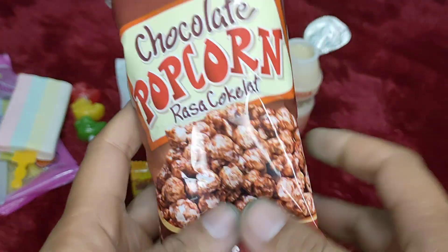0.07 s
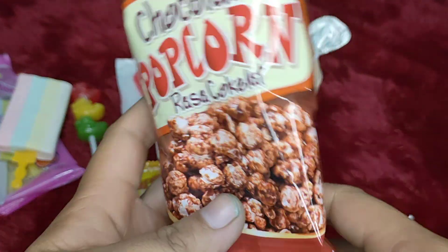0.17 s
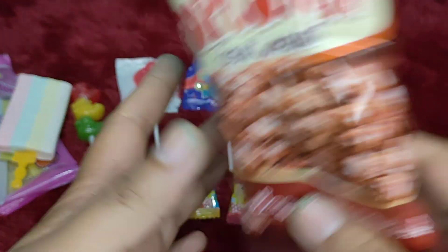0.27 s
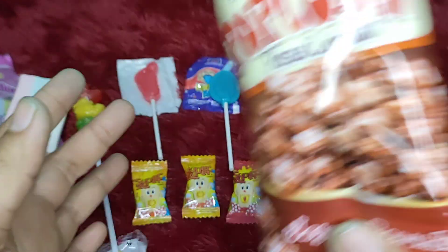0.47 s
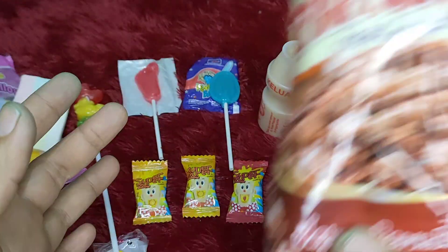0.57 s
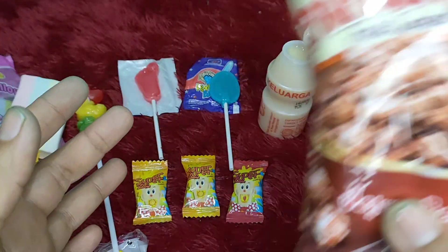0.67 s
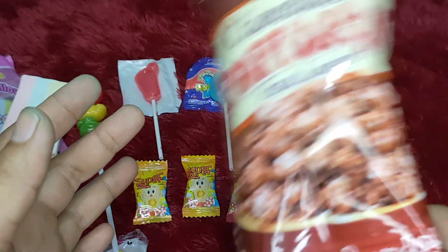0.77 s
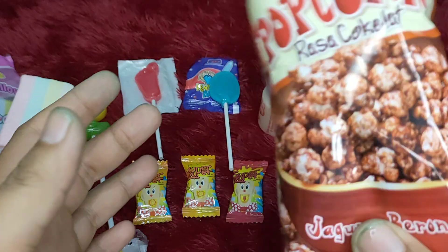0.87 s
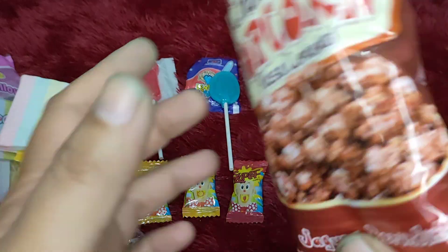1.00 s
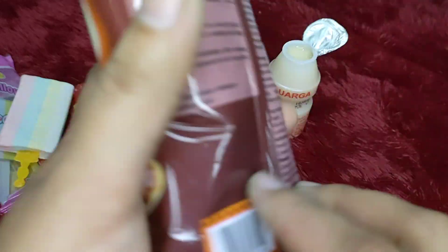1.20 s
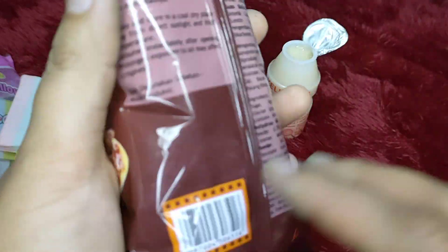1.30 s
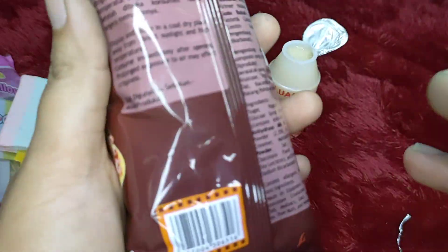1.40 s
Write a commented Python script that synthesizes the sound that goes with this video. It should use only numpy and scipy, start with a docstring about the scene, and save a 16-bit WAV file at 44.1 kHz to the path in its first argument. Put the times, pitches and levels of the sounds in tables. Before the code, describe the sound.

A plastic bag of popcorn is gripped with a crinkle, then shaken in quick rattling strokes with soft thumps. The shaking weakens and the wrapper crackles as it is turned over, close to the microphone in a small room.

```python
"""A plastic bag of chocolate popcorn is picked up, shaken and turned over in a small room, close to a
stereo pair of microphones and a little to the left. At each reversal of the hand, about eleven times a
second, the kernels pile into the bag wall, thump the air inside and then settle. The film rustles under
the fingers, its creases snap, and a fingertip now and then bumps the filled bag."""
import sys
import numpy as np
from scipy import signal
from scipy.io import wavfile

SR = 44100
rng = np.random.default_rng(int(sys.argv[2]) if len(sys.argv) > 2 else 0)


def dump(signal):
    """Clip the signal to [-1, 1] and save it as 16-bit WAV at the path in sys.argv[1]."""
    limited = np.clip(np.atleast_2d(signal).T, -1, 1)
    pcm = np.round(limited * 32767).astype(np.int16)
    wavfile.write(sys.argv[1], SR, pcm)


N = 63945


def amp(db):
    """Decibels to gain."""
    return 10 ** (np.asarray(db) / 20)


def read(points, hz):
    """Reads a table on a log-frequency axis."""
    f, value = np.transpose(points)
    return np.interp(np.log(hz + 1), np.log(f), value)


def add(mix, start_s, sound):
    """Adds a stereo sound to the mix at its start time."""
    part = mix[:, max(round(start_s * SR), 0):][:, :sound.shape[1]]
    part += sound[:, :part.shape[1]]


def pan(db):
    """Gains for a source that is db louder at the left microphone than at the right."""
    return amp(np.array([[db], [-db]]) / 2)


def lead(pair, lead_s):
    """Lets the nearer, left microphone hear a sound before the right."""
    right = np.pad(pair[1], (round(lead_s * SR), 0))[:pair.shape[1]]
    return np.array([pair[0], right])


def colour(pair, points, modes=(), size=4096):
    """Filters a mid-side pair by a spectrum scaled to unit power and returns left and right."""
    # stereo width at the microphones: (frequency [Hz], side minus mid [dB])
    width = [(60, -2.5), (150, -6.5), (500, -12), (1000, -5), (2000, -2), (4000, 0), (12000, -0.5)]
    hz = abs(np.fft.fftfreq(size, 1 / SR))
    lift_db = sum(db / (1 + (2 * (hz - f) / band_hz) ** 2) for f, band_hz, db in modes)
    gain = amp(read(points, hz) + lift_db)
    log_gain = np.log(np.maximum(gain / np.sqrt(np.mean(gain ** 2)), 1e-5))
    side_ratio = amp(read(width, hz))
    shares = np.array([np.ones(size), side_ratio]) / np.sqrt(1 + side_ratio ** 2)
    minimum_phase = np.exp(np.conj(signal.hilbert(log_gain + np.log(shares))))
    taps = np.fft.ifft(minimum_phase).real[:, :size // 2]
    mid, side = signal.fftconvolve(pair, taps, axes=1)[:, :pair.shape[1]]
    return np.array([mid + side, mid - side])


def impacts(per_s, spread_db, decay_s, size=400):
    """Tiny impacts at random moments: each a fast-dying burst and a ping from that patch of film."""
    low_hz, high_hz, ping_decay_s, ping_db = 694, 4554, 0.0015, -5
    hits = np.flatnonzero(rng.random(N) < per_s / SR)
    strength = amp(spread_db * np.clip(rng.standard_normal(N), -2, 2))
    strength /= np.sqrt(np.mean(strength ** 2) * per_s / SR)  # same power at any rate
    hz = low_hz * (high_hz / low_hz) ** rng.random(N)
    noise, phase = rng.standard_normal((2, N + size)), rng.random((N, 2, 1))
    offset = rng.integers(0, N, N)
    t, out = np.arange(size) / SR, np.zeros((2, N))
    burst_shape = np.exp(-t / decay_s) * np.sqrt(2 / (decay_s * SR))
    ping_shape = np.exp(-t / ping_decay_s) * -np.expm1(-t / decay_s) * 2 / np.sqrt(ping_decay_s * SR)
    for i in hits:
        burst = noise[:, offset[i]:offset[i] + size] * burst_shape
        ping = np.sin(2 * np.pi * (hz[i] * t + phase[i])) * ping_shape * np.sqrt(hz[i] / high_hz)
        add(out, i / SR, strength[i] * (burst + amp(ping_db) * ping))
    return out


def room_tone():
    """The faint, steady background of the room, strongest in the bass."""
    # background spectrum: (frequency [Hz], relative level [dB])
    spectrum = [(20, -2), (45, -8.5), (100, -11.5), (300, -12.5), (1000, -17), (4000, -21), (8000, -35),
                (16000, -46)]
    return amp(-55.5) * colour(rng.standard_normal((2, N)), spectrum)


def rustle():
    """Fine crinkles of the film follow the grip of the fingers."""
    # film rustling under the fingers: (time [s], level [dB])
    grip_levels = [(0, -56), (0.061, -50), (0.134, -47), (0.186, -34), (.24, -37.5), (.285, -42),
                   (.40, -36), (.67, -36.5), (.85, -33.5), (1.0, -36.5), (1.10, -37.5), (1.22, -34),
                   (1.28, -42), (1.35, -41.5), (1.40, -49), (1.45, -49)]
    # spectrum of the crinkling film: (frequency [Hz], relative level [dB])
    film_spectrum = [(50, -34.5), (100, -24), (170, -4), (350, -2.5), (550, -6.5), (850, 1), (1500, -3),
                     (2400, -3), (4000, -3), (5600, -10), (7400, -20.5), (16000, -34.5)]
    grip = amp(np.interp(np.arange(N) / SR, *np.transpose(grip_levels)))
    crinkles = impacts(per_s=1800, spread_db=1, decay_s=0.00057)
    return pan(1.5) * colour(grip * crinkles, film_spectrum)


def snap(hz, ring_s, crack_db, knock_db, pan_db, size=2048):
    """One crease buckles: a crack with a fluttering tail, a short ring of the film and a dull knock."""
    # spectrum of the crack: (frequency [Hz], relative level [dB])
    crack_spectrum = [(100, -9.5), (500, -14.5), (1500, 0), (4000, 5.5), (5500, 2.5), (8000, -10.5),
                      (12000, -20), (16000, -27)]
    # spectrum of the knock: (frequency [Hz], relative level [dB])
    knock_spectrum = [(40, -26), (130, -13), (330, -0.5), (800, -5), (1500, -5), (4000, -14.5),
                      (16000, -95)]
    crack_s, flutter_s, flutter_db, knock_s = 0.00014, 0.0038, -12, 0.0029
    t = np.arange(size) / SR
    ring = np.sin(2 * np.pi * hz * t) * np.exp(-t / ring_s) * -np.expm1(-2 * hz * t)
    ring = np.outer([1, pan_db == 0], ring)  # left microphone only, unless the snap is dead centre
    crack_noise, knock_noise = rng.standard_normal((2, 2, size))
    click = amp(-2.5) * np.outer([1, 0], t == 0)  # mid only
    burst = crack_noise * (np.exp(-t / crack_s) + amp(flutter_db) * np.exp(-t / flutter_s))
    ring_mode = (hz, 0.46 * hz, 8)  # the crack is lifted in a broad band around the ring
    crack = amp(crack_db) * colour(click + burst, crack_spectrum, [ring_mode])
    knock = amp(knock_db) * colour(knock_noise * np.exp(-t / knock_s), knock_spectrum)
    return pan(pan_db) * (ring + crack + knock)


def snaps():
    """The creases snap one after another as the bag is gripped and turned."""
    # buckling creases: (time [s], relative level [dB], ring pitch [Hz], ring decay [s],
    # crack gain [dB], knock gain [dB], left minus right [dB])
    creases = [(0.068, -29, 970, 0.003, -1, -2, 5), (.106, -18.5, 2250, 0.0015, -9, -7.5, 2.5),
               (0.181, -25.5, 1740, 0.00083, -1, -7, 15), (.215, -32, 950, 0.0027, 2, -10.5, 13),
               (0.2365, -7.5, 3920, .0013, 2, -31, 4), (0.2484, -21, 4640, 0.00067, 5.5, -32, 1),
               (.259, -20.5, 2160, 0.001, 5.5, -27, 5), (0.2689, -25.5, 1150, 0.00084, 0, -3, 7),
               (0.4653, 4.5, 3570, 0.00044, -2.5, -42, -2.5), (0.5101, -12.5, 3030, .0012, 0, -15, 1),
               (1.0027, -16.5, 2860, 0.0025, 0, -9, 1.5), (1.0195, -11.5, 1990, 0.0016, -6, -14.5, 1),
               (1.041, -7.5, 1450, 0.002, -9.5, -18, 1.5), (1.065, -10, 4530, 0.00096, 3, -26, 7.5),
               (1.0958, -17.5, 2000, 0.0014, 3, -5.5, 9), (1.1475, -14.5, 3270, 0.0026, 3.5, -28, 2.5),
               (1.168, -17.5, 2240, 0.0028, -3, -35.5, 3), (1.2125, -7.5, 3610, 0.00096, -4, -18, 4.5),
               (1.247, -9, 2500, 0.00036, -1, -21.5, 0), (1.289, -16, 2270, 0.0032, 3, -12.5, 0.5),
               (1.333, -24, 2130, 0.002, -20, -13, 7), (1.362, -23.5, 3900, 0.0012, 1.5, -34, 4)]
    out = np.zeros((2, N))
    for start_s, db, *crease in creases:
        add(out, start_s, amp(db) * snap(*crease))
    return amp(-2) * out


def finger_bumps(decay_s=0.005, size=2048):
    """A finger lands on the filled bag: a soft, low, quickly damped thud."""
    # finger landings: (time [s], level [dB], pitch [Hz])
    landings = [(.069, -38, 530), (1.209, -31, 261), (1.2877, -35, 400)]
    t, out = np.arange(size) / SR, np.zeros((2, N))
    for start_s, db, hz in landings:
        thud = np.sin(2 * np.pi * hz * t) * np.exp(-t / decay_s)
        add(out, start_s, pan(1.5) * amp(db) * thud)
    return out


def stroke(start_s, hold_s, fall_s):
    """Envelope of one landing: a few kernels slide in, the pile hits, and loose ones tumble on."""
    attack_s, slide_s, settle_s = 0.002, 0.0089, 0.05
    slide, settle = amp(-6.5), amp(-17.5)
    t = np.arange(N) / SR - start_s
    early, late = np.maximum(-t, 0), np.maximum(t - hold_s, 0)
    rise = (1 - slide) * np.exp(-early / attack_s) + slide * np.exp(-early / slide_s)
    fall = (1 - settle) * np.exp(-late / fall_s) + settle * np.exp(-late / settle_s)
    return rise * fall


def air_cushion(start_s, landing_hz=135, octaves_per_s=7.72, width_hz=49):
    """The air in the bag booms softly: a narrow band of noise whose pitch rises as the bag tightens."""
    t = np.arange(N) / SR - start_s
    hz = landing_hz * 2 ** np.clip(octaves_per_s * t, -1, 1)
    carrier = np.exp(2j * np.pi * np.cumsum(hz) / SR)
    noise = rng.standard_normal(N) + 1j * rng.standard_normal(N)
    drift = signal.lfilter(*signal.butter(2, width_hz / 2, fs=SR), noise)
    boom = (carrier * drift).real
    return amp(-24) * boom / boom.std()


def kernels(stray_per_s=800, pile_per_s=1400, treble_hz=2500):
    """Showers of kernels hit the film, ring the bag and thump its air cushion."""
    # kernels landing at each stroke: (time [s], level [dB], hold [s], fall [s], treble gain [dB],
    # thump gain [dB], left minus right [dB])
    shakes = [(0.305, -21.5, 0.0088, 0.0061, -3, 6, 1.5), (.332, -14.5, 0.032, 0.0099, 0.5, 2, -.5),
              (0.416, -19, 0.02, 0.02, 3.5, 3, 1.5), (0.523, -17, 0.013, .014, -0.5, 1, 0),
              (0.597, -21, 0.022, 0.018, 3, 2.5, 2), (0.703, -18.5, 0.01, 0.013, 3.5, 1.5, 0),
              (0.775, -20, 0.022, 0.017, 1.5, 2.5, 3), (0.874, -25.5, 0.025, 0.0133, 1, 1.5, 1),
              (0.937, -30.5, 0.026, 0.014, 3, 7.5, 2), (1.045, -29.5, 0.034, 0.027, -5.5, 1, 2.5),
              (1.116, -32.5, 0.014, 0.02, -0.5, -7, 4)]
    # spectrum of kernels on the film: (frequency [Hz], relative level [dB])
    kernel_spectrum = [(120, -36.5), (200, -11.5), (340, -3), (456, -7), (709, -5), (806, -1.5),
                       (1270, -5.5), (2170, -5), (3310, -9), (4120, -2), (8420, -26), (14100, -34),
                       (16000, -42)]
    # resonances of the filled bag: (frequency [Hz], width [Hz], lift [dB])
    bag_modes = [(316, 25, 0.5), (802, 66, 3), (963, 63, 2), (1124, 41, 2.5), (1724, 136, 3.5),
                 (2130, 240, 5), (2970, 114, 6.5), (4320, 870, -6.5)]
    # spectrum of the thumped air in the bag: (frequency [Hz], relative level [dB])
    thump_spectrum = [(30, -35), (70, -14), (110, -22.5), (155, -1), (210, 0.5), (300, -27), (600, -27),
                      (2000, -68)]
    strokes = [stroke(start_s, hold_s, fall_s) for start_s, _, hold_s, fall_s, *_ in shakes]
    hits = impacts(stray_per_s + pile_per_s * sum(strokes), spread_db=3, decay_s=0.00053)
    rattle = amp(-0.5) * colour(hits, kernel_spectrum, bag_modes)
    treble = signal.lfilter(*signal.butter(1, treble_hz, "high", fs=SR), rattle)
    thump = amp(-20.5) * colour(rng.standard_normal((2, N)), thump_spectrum)
    out = np.zeros((2, N))
    for envelope, (start_s, db, _, _, treble_db, thump_db, pan_db) in zip(strokes, shakes):
        shower = rattle + (amp(treble_db) - 1) * treble
        air = amp(thump_db) * (thump + air_cushion(start_s))
        out += amp(db) * envelope * pan(pan_db) * (shower + air)
    return out


def room_reverb(sound, size=16384, frame=256):
    """The small room's diffuse tail, different at each microphone; its midrange dies first."""
    # decay of the room: (frequency [Hz], time to fall 60 dB [s])
    decay_times = [(100, 0.31), (1000, 0.083), (4000, 0.19), (14000, 0.42)]
    # spectrum of the reflections: (frequency [Hz], relative level [dB])
    spectrum = [(80, -4.5), (300, 0), (900, 2), (2000, -0.5), (5000, -1), (16000, -0.5)]
    hz, t, noise = signal.stft(rng.standard_normal((2, size)), SR, nperseg=frame)
    decay = amp(-60 * t / read(decay_times, hz)[:, None])
    tail = signal.istft(noise * decay, SR, nperseg=frame)[1]
    tail[:, :frame // 2] = 0  # gap before the first reflection
    tail = colour(tail, spectrum)
    tail /= np.linalg.norm(tail, axis=1, keepdims=True)
    return signal.fftconvolve(sound, tail, axes=1)[:, :N]


def scene():
    """The bag close up, a little nearer the left microphone, with the small room behind it."""
    bag = lead(kernels() + rustle(), lead_s=0.00007) + snaps() + finger_bumps()
    return bag + amp(-8.5) * room_reverb(bag) + room_tone()


def record(dry):
    """The recorder's band limit cuts off the highest treble."""
    lowpass = signal.firwin(255, cutoff=16300, window=("kaiser", 9), fs=SR)
    return signal.oaconvolve(dry, lowpass[None], "same")


dry = scene()
out = record(dry)
dump(out)
```